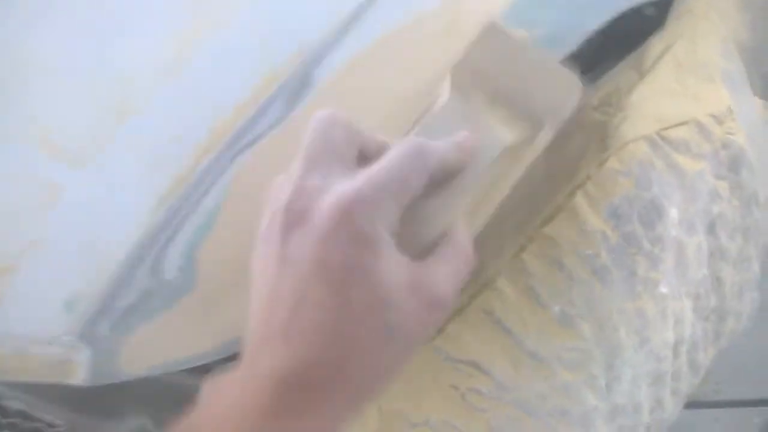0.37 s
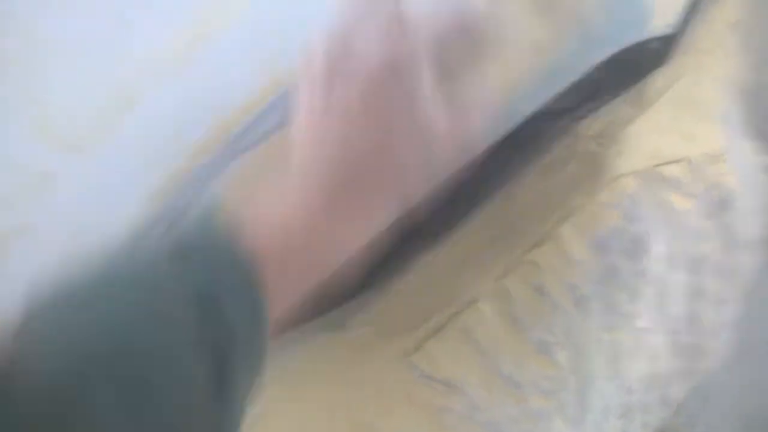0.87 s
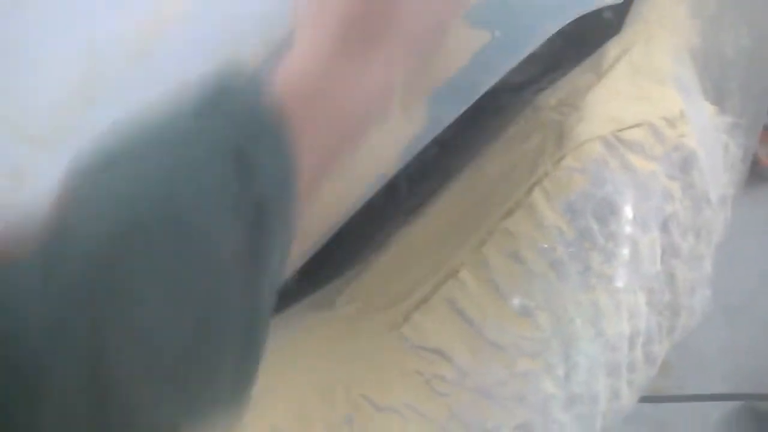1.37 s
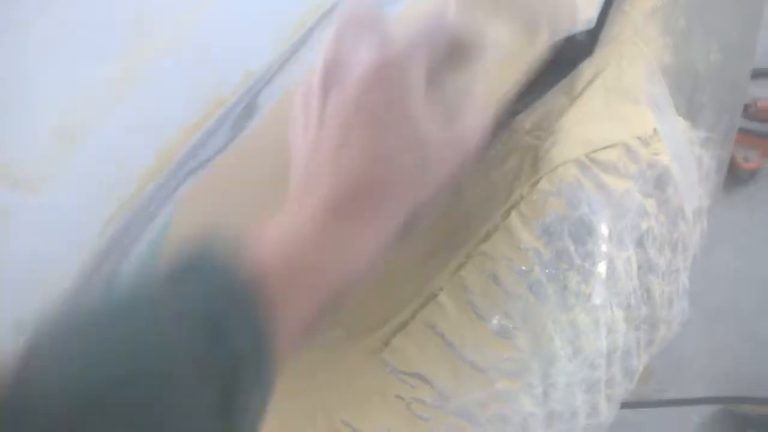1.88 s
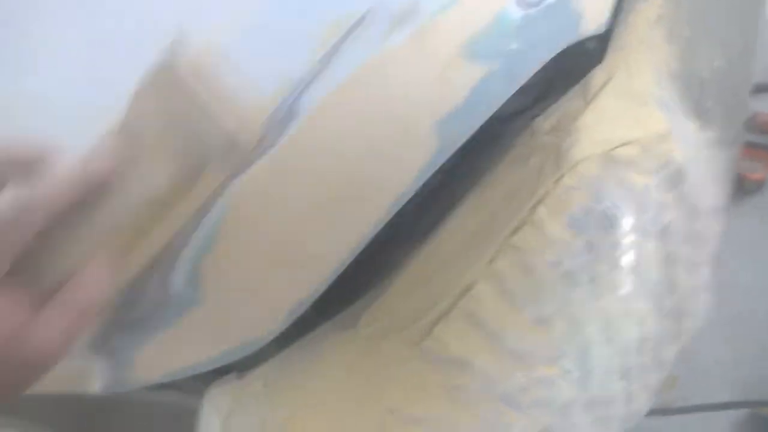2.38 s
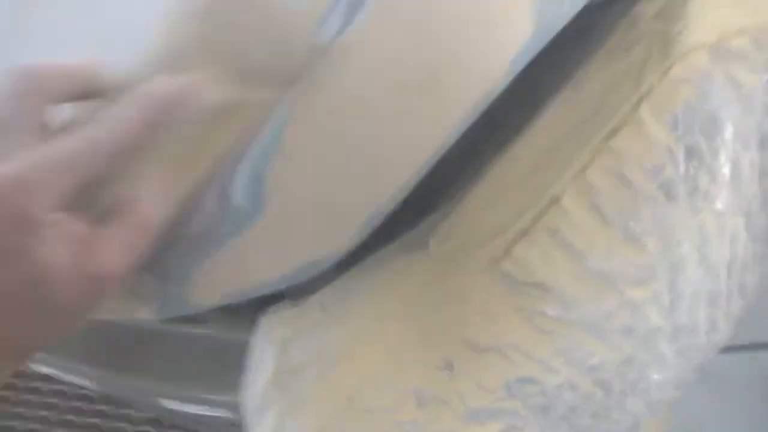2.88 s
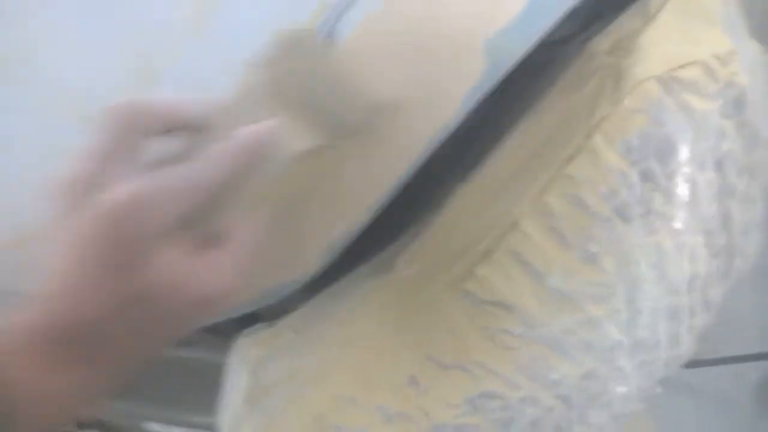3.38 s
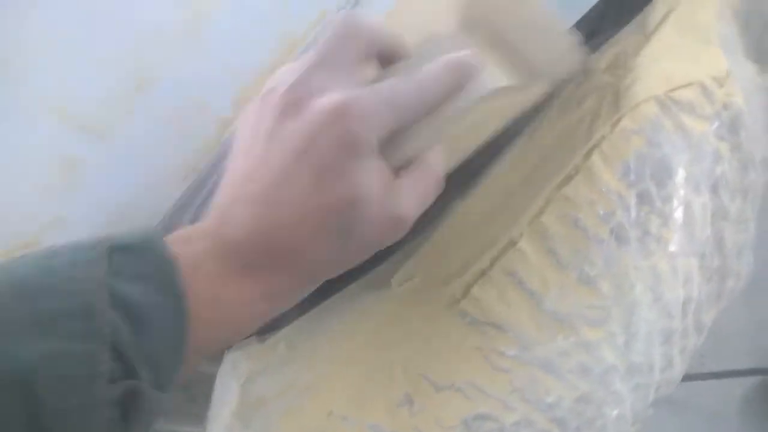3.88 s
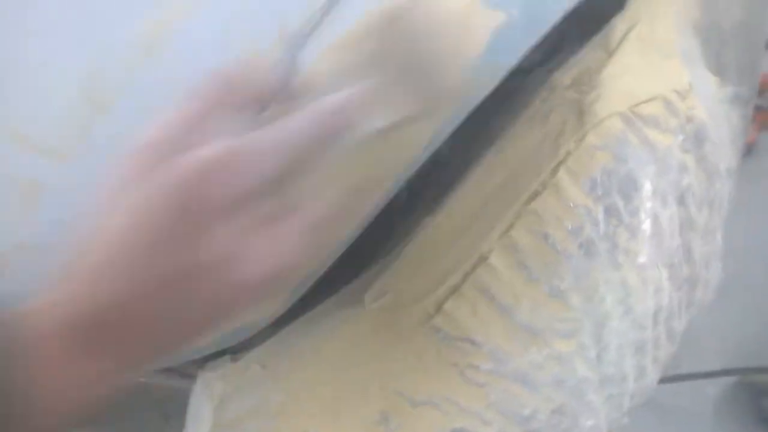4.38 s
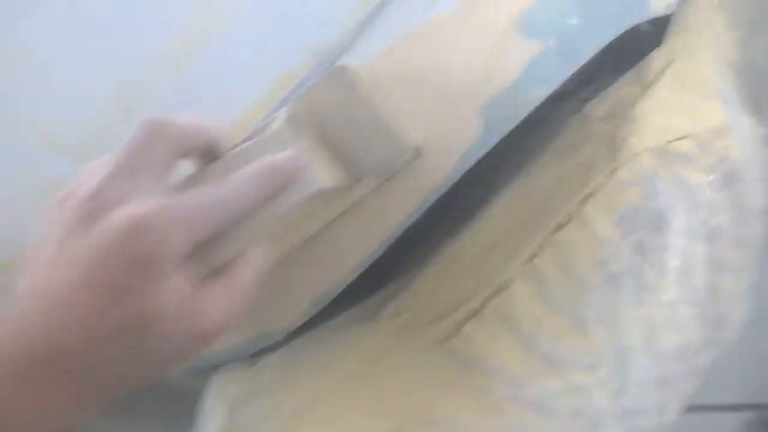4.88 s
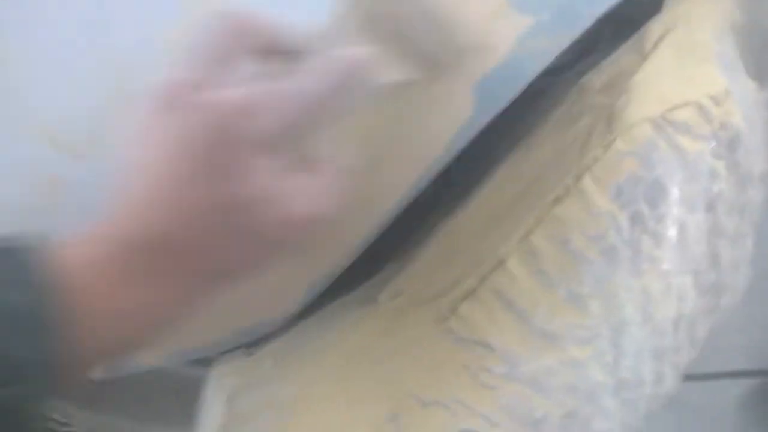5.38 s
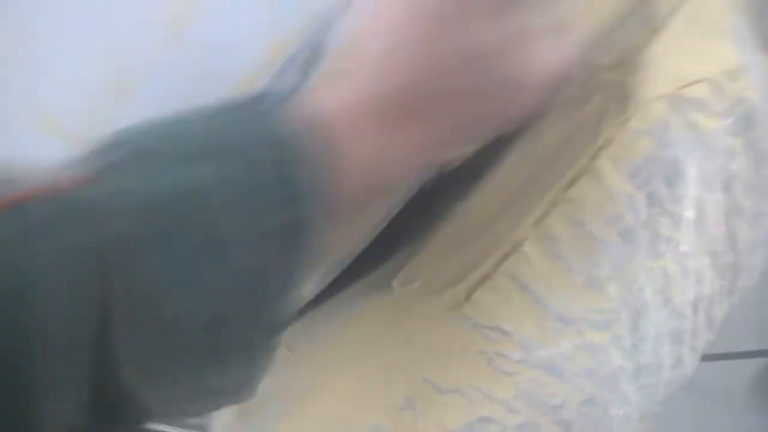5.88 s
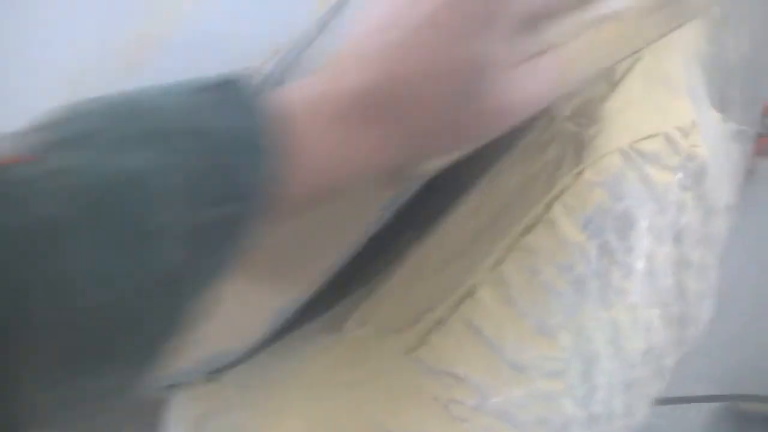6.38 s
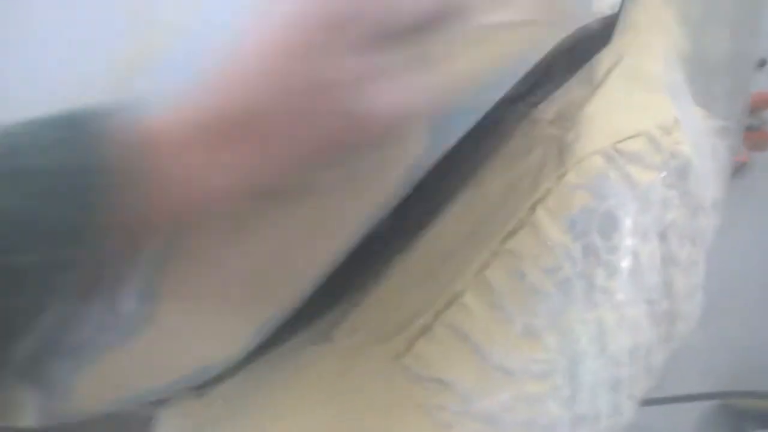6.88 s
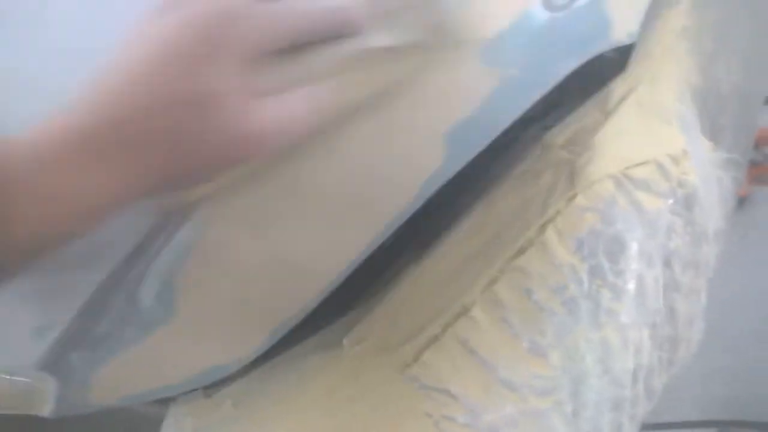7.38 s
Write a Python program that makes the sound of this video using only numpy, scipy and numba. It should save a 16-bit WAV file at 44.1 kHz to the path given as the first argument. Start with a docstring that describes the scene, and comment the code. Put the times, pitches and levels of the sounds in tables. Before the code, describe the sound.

Brisk hand sanding heard close up in a garage: bright sandy swishes alternate with a coarser scrape, over a dull rumble of hollow sheet metal. A short pause comes early, with a faint rustle, then a hollow knock and clatter as the block lands. Vigorous strokes continue to the end, with sharp grit catches and slight room echo.

```python
"""A gritty hiss rushes back and forth, about five strokes a second: a sanding block on a filled car panel in a garage.
It is lifted briefly, lands with a knock and works on. The hiss is dense tiny clicks of grit tearing loose,
the scrape is coarser clicks ringing the block, and the rumble is drag and knocks ringing the hollow panel.
A diffuse garage echo and a faint room tone with hum and whine lie behind; both channels are alike."""
import sys
import numpy as np
from scipy import signal
from scipy.fft import rfft, irfft, next_fast_len
from scipy.io import wavfile
from scipy.ndimage import uniform_filter1d
from numba import njit

SR = 44100
rng = np.random.default_rng(int(sys.argv[2]) if len(sys.argv) > 2 else 0)


def invert_db(level):
    """Linear amplitude ratio for a level in decibels (20 dB per decade), elementwise."""
    return 10 ** (np.asarray(level, dtype=float) / 20)


def generate_wav(signal):
    """Clip the signal to [-1, 1] and save it as 16-bit WAV at the path in sys.argv[1]."""
    frames = np.transpose(np.atleast_2d(signal))
    scaled = np.clip(frames, -1, 1) * 32767
    pcm = np.round(scaled).astype(np.int16)
    wavfile.write(sys.argv[1], SR, pcm)


N = 341334

# Strokes from one turn of the hand to the next, pulls and pushes alternating; levels are drives at mid-stroke,
# the rumble's at the turn before its dip: start_s, hiss_db, hiss_late_over_early_db, scrape_db, rumble_drive_db
STROKE_TABLE = [(-0.025, -24, -4, -35, -48), (0.17, -24.5, 1, -28, -43), (0.343, -24.5, 1.5, -34, -49.5),
                (0.509, -26, 3.5, -30, -42), (0.698, -24.5, 0.5, -35.5, -47.5),
                (0.88, -27.5, 6, -28.5, -44.5), (1.096, -25, 1.5, -37, -43), (1.257, -24.5, -4, -33, -47),
                (1.448, -26.5, 0, -34.5, -48), (1.617, -28, -2.5, -32.5, -46),
                (1.792, -26.5, -4.5, -39, -50.5), (1.95, -28, -0.5, -31.5, -46.5),
                (2.142, -33.5, -5, -54, -51.5), (2.645, -28, 6, -32, -55), (2.852, -29.5, -5.5, -37, -47.5),
                (3.034, -25, 5.5, -26.5, -48.5), (3.233, -28.5, 4.5, -33.5, -39), (3.431, -25, 3, -26, -53),
                (3.631, -28, 3, -34.5, -41), (3.821, -24.5, -3, -29, -53), (4.018, -27, 4.5, -37, -39.5),
                (4.192, -25, 1, -27.5, -50), (4.405, -27, 0, -36.5, -44.5), (4.591, -25, -0.5, -27, -50.5),
                (4.803, -28, 3, -35, -40.5), (4.99, -24.5, 3, -28.5, -55), (5.212, -26, 5, -33.5, -44),
                (5.435, -28, -14, -31, -45), (5.645, -28, 16.5, -37, -39), (5.82, -24.5, 3, -34, -47),
                (6.035, -24.5, -4.5, -38, -45.5), (6.236, -24.5, -0.5, -31, -55),
                (6.451, -26.5, 5, -40, -44), (6.655, -23.5, -3, -38, -53), (6.886, -25, 2, -40, -47.5),
                (7.083, -26, 3, -37.5, -48.5), (7.303, -27, 0, -60.5, -56), (7.539, -28, 9, -38, -55)]
# Grit catches and knocks of the block, as impulse drives: time_s, click_drive_db, panel_knock_drive_db
CATCH_TABLE = [(0.7242, -25.5, -19), (1.296, -17, -26.5), (1.815, -23, -30), (2.564, -21.5, -6),
               (2.636, -30.5, -15.5), (2.6788, -27, -20), (2.734, -37, -17.5), (2.877, -22, -21),
               (2.9731, -12.5, -26), (3.1092, -8.5, -21), (4.2073, -32.5, -17), (5.229, -11.5, -10.5),
               (5.4866, -10.5, -22), (5.6608, -23, -26), (5.82, -33, -14), (6.0576, -20.5, -18),
               (6.462, -24, -21), (7.383, -20.5, -30.5), (7.6166, -22.5, -20)]
# Spectrum of the torn grit: frequency_hz, relative_level_db (per Hz)
GRIT_SPECTRUM = [(1470, -23), (2500, -13.5), (3590, -10.5), (4280, -4.5), (5960, -3.5), (7450, 1.5),
                 (9820, -9.5), (11700, -20), (15100, -14.5), (15700, -14)]
# Resonances of the block and the filler under it: frequency_hz, width_hz, relative_level_db
BLOCK_MODES = [(1407.3, 378, -5), (1743, 434, -0.5), (2115.6, 403, 0), (2412, 446.5, 0), (3036, 698, -2.5),
               (3606, 1252, -5.5), (5030, 1214, -8.5)]
# Resonances of the hollow sheet metal: frequency_hz, width_hz, relative_level_db
PANEL_MODES = [(80, 21.1, 1), (119.4, 39, -0.5), (164, 23.2, 5), (210.8, 48.5, -9), (286, 32.1, -1),
               (312.2, 28.9, 0), (375, 44.6, 2.5), (444.8, 39.9, 1), (487.9, 32.8, -0.5), (574.7, 67.7, -5),
               (645.9, 52, -5.5), (762.6, 70.6, -3.5), (827.3, 67.3, -1), (975, 105, -5), (1161, 138, -5.5)]
# Spectrum of the room tone: frequency_hz, relative_level_db (per Hz)
AIR_SPECTRUM = [(35, -27), (60, -1.5), (259, -16.5), (521, -15), (889, -31.5), (2360, -3.5), (11200, -19),
                (14500, -29.5), (15500, -34)]
# Garage echo, time to fall by 60 dB in each band: frequency_hz, decay_s
ECHO_DECAY = [(125, 0.01), (250, 0.5), (500, 0.6938), (1000, 0.7), (2000, 0.5617), (4000, 0.3955),
              (8000, 0.37), (14000, 0.02)]
# Drive of the deep panel modes, a list holding one curve: time_s, drive_db
DEEP_CURVES = [
    [(0.0, -59.5), (0.47, -65), (0.56, -42.5), (0.84, -72.5), (0.95, -47.5), (1.08, -65), (1.92, -74),
     (2.0, -50), (2.37, -81.5), (2.52, -78.5), (2.56, -52.5), (2.82, -55.5), (5.02, -58.5), (5.84, -51),
     (5.86, -57), (7.26, -58.5), (7.44, -74), (7.74, -55)],
]
# The block judders on the sheet as it lands or runs over a hollow place: start_s, drive_db, decay_to_minus_60_db_s
JUDDER_TABLE = [(.45, -40, .8), (.555, -37, .7), (2.565, -23.5, .5), (3.105, -36, 1.5), (3.17, -33, .6),
                (3.59, -37, .8), (5.438, -35, .6), (5.56, -35, .7), (6.05, -41, .5), (6.46, -41, .4),
                (7.61, -45, .6)]
# Where along a push the block bites hardest: time_s, scrape_late_over_early_db
PUSH_LEAN_CURVE = [(0, 4), (.5, -10), (1.25, 4), (2.0, 0), (2.62, 14), (3.43, 0), (3.82, -6), (5.0, -14),
                   (5.43, 8), (5.82, -4), (7.7, -4)]

LAST_TURN_S = 7.76
LIFT_START_S, LIFT_END_S = 2.235, 2.565
AIR_DB, ECHO_DB = -72.5, -12  # echo is relative to the near sound
WHINE_HZ, WHINE_DB = 14080, -92
HUM_HZ, HUM_WIDTH_HZ, HUM_DB = 44, 14, -71
# a faint rustle as the hand comes back
RUSTLE_START_S, RUSTLE_PEAK_S, RUSTLE_DB = 2.424, 2.55, -65
# the paper still whispers at a turn; the scrape there follows a share of the stroke's strength
CREEP_HISS_DB, CREEP_SCRAPE_DB, CREEP_FOLLOWS = -52.5, -41, .25
# a harder stroke has a sharper speed arch: usual level, exponent there, rise of exponent per dB
USUAL_HISS_DB, HISS_PEAKED, HISS_PEAKED_PER_DB = -26, 1.12, .055
USUAL_SCRAPE_DB, SCRAPE_PEAKED, SCRAPE_PEAKED_PER_DB = -33, 1.1, .04
# scrape late over early on a pull, and the share of the hiss's lean that every scrape follows
PULL_LEAN_DB, SCRAPE_FOLLOWS = -5, .25
# the rumble is fullest a little before a turn, and sags while the block stands there
RUMBLE_LEAD_S, TURN_DIP_DB = .03, -3
JUDDER_ATTACK_S = .005
DEEP_HZ, UPPER_HZ = 180, 620  # borders of the deep, middle and upper panel modes
# upper modes: drive over the rumble's at its usual level, and the share of its swings that they miss
USUAL_RUMBLE_DB, UPPER_DB, UPPER_MISSES = -43.5, -2.5, .33
PANEL_DB = 19  # gain of the whole panel


def level(x, db):
    """Scale to an rms level."""
    return x * invert_db(db) / np.sqrt(np.mean(x ** 2))


def colour(x, points):
    """Shape a sound by a (Hz, dB) spectrum, interpolated over log frequency."""
    hz, db = np.transpose(points)
    size = next_fast_len(N)
    f = np.maximum(np.fft.rfftfreq(size, 1 / SR), 1)
    gain = invert_db(np.interp(np.log(f), np.log(hz), db))
    return irfft(rfft(x, size) * gain, size)[:N]


def walk(rate):
    """Random levels held 1 / rate s and slewed twice; spread near 1."""
    hold = int(SR / rate)
    steps = np.repeat(rng.standard_normal(N // hold + 1), hold)
    return 1.3 * uniform_filter1d(uniform_filter1d(steps, hold), hold)[:N]


@njit
def svf(x, hz, width):
    """State-variable band-pass with a moving centre, gain 1 at the centre."""
    y, band, low = np.empty(len(x)), 0., 0.
    for i in range(len(x)):
        g, k = np.tan(np.pi * hz[i] / SR), width / hz[i]
        v = (band + g * (x[i] - low)) / (1 + g * (g + k))
        band, low, y[i] = 2 * v - band, low + 2 * g * v, k * v
    return y


def ring(force, modes, patchy_db, drift, rate):
    """Resonances of a body, each driven more or less and shifting a little at random; signs alternate."""
    out = np.zeros(N)
    for k, (hz, width, db) in enumerate(modes):
        gain = invert_db(db + patchy_db * walk(rate))
        centre_hz = hz * (1 + drift * walk(rate))
        out += (-1) ** k * gain * svf(force, centre_hz, 1. * width)
    return out


def tearing(rate, spread_db, uneven_db, uneven_rate):
    """Dense clicks of grains breaking off, few large among many small, size capped; the bite wavers."""
    hit, size, sign = rng.random((3, N))
    size_db = spread_db * np.minimum(-np.log(1 - size), 5)
    clicks = (hit < rate / SR) * invert_db(size_db) * np.sign(sign - .5)
    return level(clicks, 0) * invert_db(uneven_db * walk(uneven_rate))


def blows(db):
    """One impulse for each catch."""
    out = np.zeros(N)
    out[(np.array(CATCH_TABLE)[:, 0] * SR).astype(int)] = invert_db(db)
    return out


def garage_air():
    """Faint room tone of coloured noise with a wavering low hum, a thin high whine and a short rustle."""
    s = np.arange(N) / SR
    whine = np.sqrt(2) * invert_db(WHINE_DB) * np.sin(2 * np.pi * WHINE_HZ * s)
    hum_mode = [(HUM_HZ, HUM_WIDTH_HZ, 0)]
    hum = ring(rng.standard_normal(N), hum_mode, patchy_db=6.0, drift=0.031, rate=2.595)
    rustle = np.interp(s, [RUSTLE_START_S, RUSTLE_PEAK_S, LIFT_END_S + 0.046], [0, 1, 0])
    swell = invert_db(AIR_DB) + invert_db(RUSTLE_DB) * rustle
    air = level(colour(rng.standard_normal(N), AIR_SPECTRUM), 0)
    return swell * air + level(hum, HUM_DB) + whine


def walls(x):
    """Diffuse echo: a noise tail that fades in over 11 ms and decays at its own pace in each band."""
    s = np.arange(SR) / SR
    tail = np.zeros(SR)
    for hz, t60 in ECHO_DECAY:
        band = svf(rng.standard_normal(SR), np.full(SR, 1. * hz), 0.928 * hz)
        tail += band * invert_db(-60 * s / t60)
    tail *= np.clip(s / 0.01115, 0, 1)
    return signal.fftconvolve(x, tail / np.sqrt(np.sum(tail ** 2)))[:N]


def judders(s):
    """Power of the judders: each sets in within milliseconds and dies away."""
    power = np.zeros(N)
    for at, db, t60 in JUDDER_TABLE:
        attack = np.clip((s - at) / JUDDER_ATTACK_S, 0, 1)
        power += (attack * invert_db(db - 60 * (s - at).clip(0) / t60)) ** 2
    return power


def strokes():
    """Hiss and scrape gains and rumble drive in dB: the hand's speed swells like an arch from turn to turn."""
    s = np.arange(N) / SR
    start, hiss_db, hiss_lean, scrape_db, rumble_db = np.transpose(STROKE_TABLE)
    end = np.append(start[1:], LAST_TURN_S)
    end[np.searchsorted(start, LIFT_START_S) - 1] = LIFT_START_S
    k = np.clip(np.searchsorted(start, s, side="right") - 1, 0, None)  # stroke under way
    phase = np.clip((s - start[k]) / (end - start)[k], 0, 1)
    arch = np.sin(np.pi * phase).clip(0)
    # after the lift the block rests a moment before it slides
    touch = np.maximum(s < LIFT_START_S, np.clip((s - LIFT_END_S) / .05, 0, 1))

    def swell(db, lean, peaked):
        """Arch of each stroke, tilted towards its early or late part."""
        return arch ** np.maximum(peaked[k], .2) * invert_db(db[k] + lean[k] * (phase - .5))

    hiss_peaked = HISS_PEAKED + HISS_PEAKED_PER_DB * (hiss_db - USUAL_HISS_DB)
    hiss = swell(hiss_db, hiss_lean, hiss_peaked)

    harder_db = scrape_db - USUAL_SCRAPE_DB
    is_push = np.arange(len(start)) % 2
    push_lean = np.interp(start, *np.transpose(PUSH_LEAN_CURVE))
    scrape_lean = np.where(is_push, push_lean, PULL_LEAN_DB) + SCRAPE_FOLLOWS * hiss_lean
    scrape = swell(scrape_db, scrape_lean, SCRAPE_PEAKED + SCRAPE_PEAKED_PER_DB * harder_db)
    creep_db = CREEP_SCRAPE_DB + CREEP_FOLLOWS * np.interp(s, (start + end) / 2, harder_db)

    # one end of the path drums more than the other
    turn_db = np.interp(s + RUMBLE_LEAD_S, start, rumble_db)
    rumble = touch * invert_db(turn_db + TURN_DIP_DB * (1 - arch))
    drag_db = 10 * np.log10(rumble ** 2 + judders(s) + 1e-12)
    return np.hypot(hiss, touch * invert_db(CREEP_HISS_DB)), np.hypot(scrape, touch * invert_db(creep_db)), drag_db


def panel(drag_db):
    """Stick and slip of the block, and knocks, ring the sheet metal; where it is rubbed decides which modes speak."""
    force = invert_db(drag_db) * tearing(1500, spread_db=2.2, uneven_db=1.5, uneven_rate=25)
    force = force + blows(np.array(CATCH_TABLE)[:, 2])
    swing_db = np.clip(drag_db - USUAL_RUMBLE_DB, -20, 30)
    # taking the swing away lets the deep modes follow their own curve
    deep_curve_db = np.interp(np.arange(N) / SR, *np.transpose(DEEP_CURVES[0]))
    deep_db = deep_curve_db - USUAL_RUMBLE_DB - swing_db
    upper_db = UPPER_DB - UPPER_MISSES * swing_db
    deep = [m for m in PANEL_MODES if m[0] < DEEP_HZ]
    middle = [m for m in PANEL_MODES if DEEP_HZ <= m[0] <= UPPER_HZ]
    upper = [m for m in PANEL_MODES if m[0] > UPPER_HZ]
    out = np.zeros(N)
    for modes, db in ((deep, deep_db), (middle, 0), (upper, upper_db)):
        out += invert_db(db) * ring(force, modes, patchy_db=1.8, drift=.02, rate=12)
    return invert_db(PANEL_DB) * out


def block(gain):
    """Coarser tearing rings the block and the filler under it."""
    force = tearing(7000, spread_db=2.68, uneven_db=1.0, uneven_rate=57)
    return gain * level(ring(force, BLOCK_MODES, patchy_db=1.2, drift=.03, rate=16), 0)


def grit(gain, dulling=0.063, fast_db=-25, late_top_db=4):
    """Hiss of torn grit: slow motion dulls the top, the top opens as work goes on, catches tick."""
    hiss = colour(tearing(20000, spread_db=2.0, uneven_db=1.5, uneven_rate=60), GRIT_SPECTRUM)
    # the hand's reflection, about 0.6 ms late and wandering, ripples the colour
    lag = SR * (0.000596 + 0.000148 * walk(6))
    reflection = np.interp(np.arange(N) - lag, np.arange(N), hiss)
    hiss = level(hiss + 0.307 * reflection, 0)
    top = signal.sosfilt(signal.butter(2, 10000, "high", fs=SR, output="sos"), hiss)
    opening = invert_db(late_top_db * (np.arange(N) / N - 2.0))
    top_gain = (gain / invert_db(fast_db)) ** dulling * opening
    # a catch is a sharp tick, then the paper bites harder for a moment
    s = np.arange(4096) / SR
    burst = rng.standard_normal(4096) * (np.exp(-s / 0.00134) + invert_db(-13) * np.exp(-s / 0.0255))
    ticks = np.convolve(blows(np.array(CATCH_TABLE)[:, 1]), burst)[:N]
    return gain * (hiss + (top_gain - 1) * top) + colour(ticks, GRIT_SPECTRUM)


def scene():
    """Block on panel, its echo in the garage, and the room tone; both channels alike."""
    hiss, scrape, drag_db = strokes()
    near = panel(drag_db) + block(scrape) + grit(hiss)
    mono = near + invert_db(ECHO_DB) * walls(near) + garage_air()
    return np.tile(mono, (2, 1))


def roll_off(x):
    """The treble ends steeply here."""
    return signal.sosfilt(signal.butter(12, 16930, fs=SR, output="sos"), x)


def record(dry):
    """A steep elliptic low-pass cuts the top above 15.8 kHz."""
    mix = signal.sosfilt(signal.ellip(10, .3, 70, 15800, fs=SR, output="sos"), dry)
    return roll_off(mix)


dry = scene()
out = record(dry)
generate_wav(out)
```